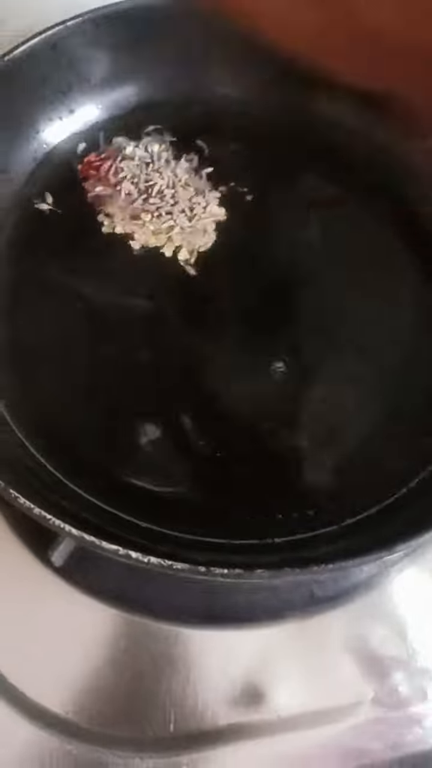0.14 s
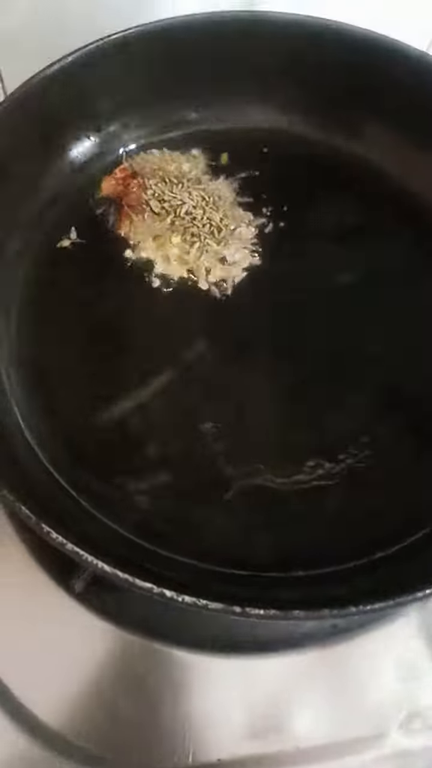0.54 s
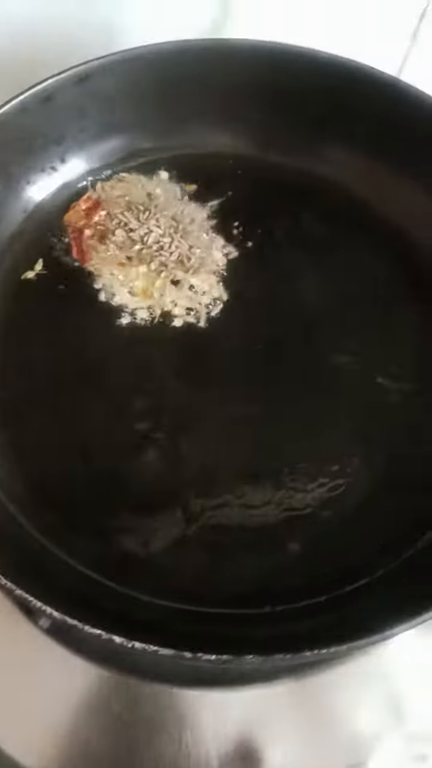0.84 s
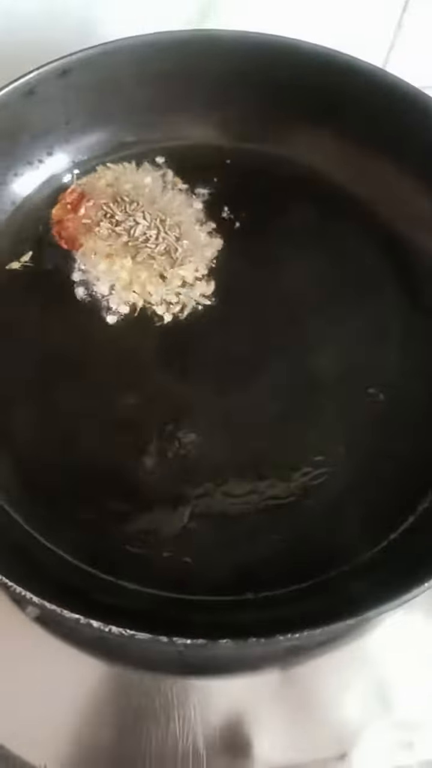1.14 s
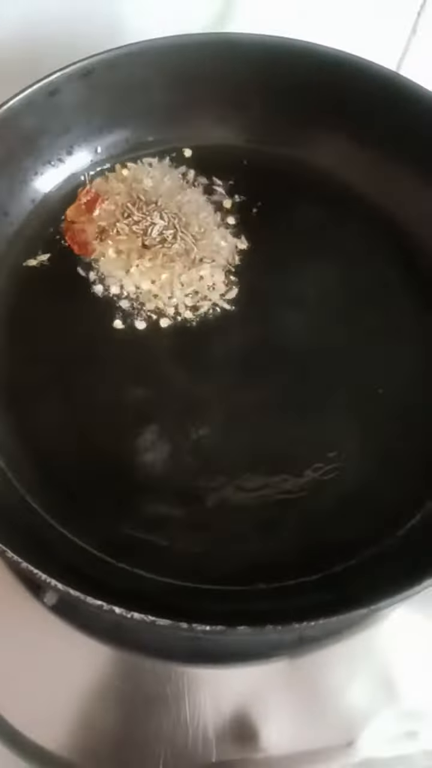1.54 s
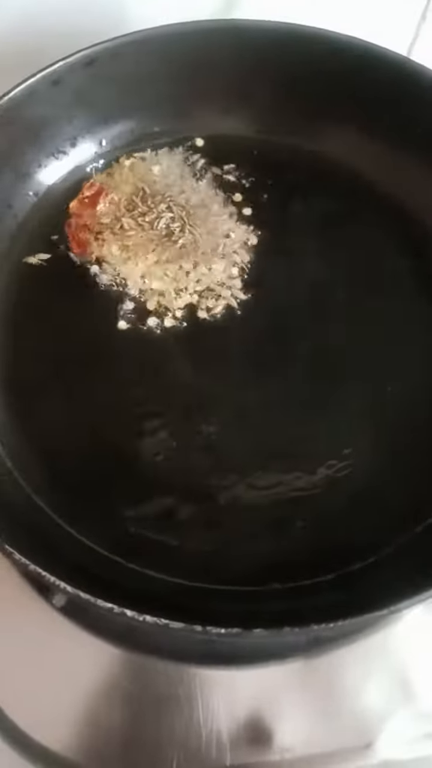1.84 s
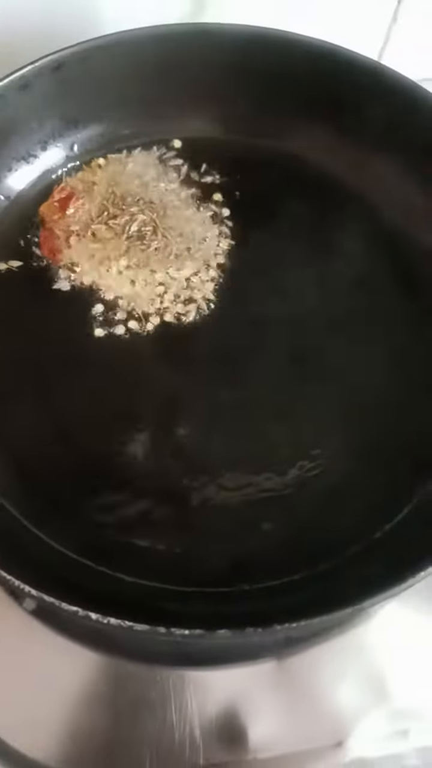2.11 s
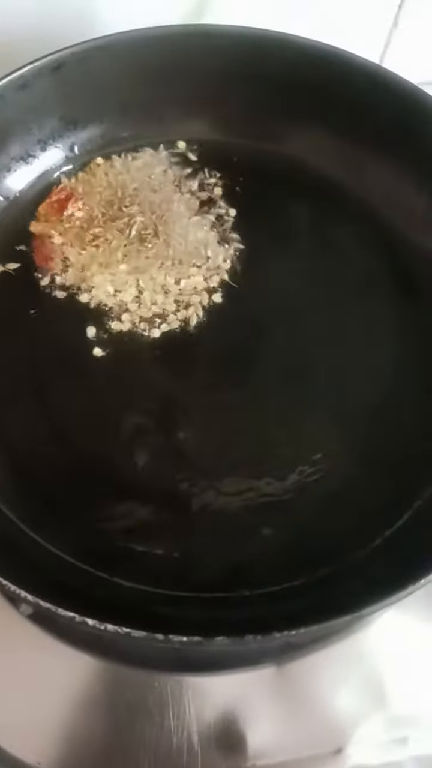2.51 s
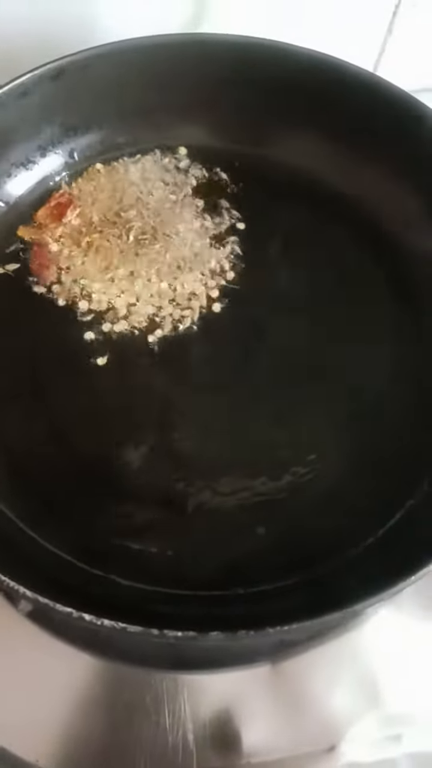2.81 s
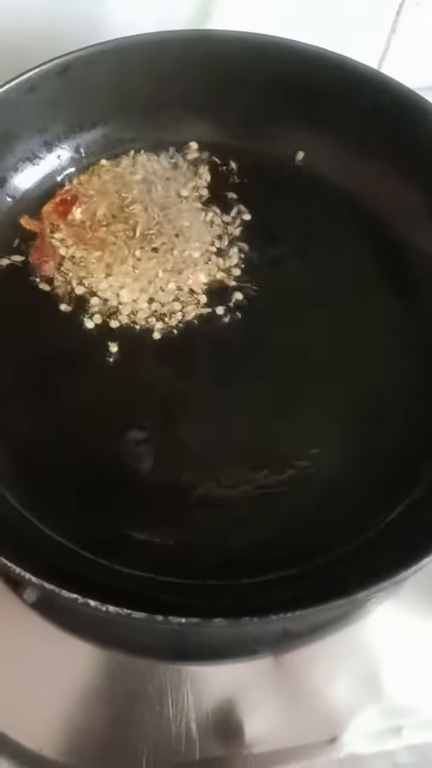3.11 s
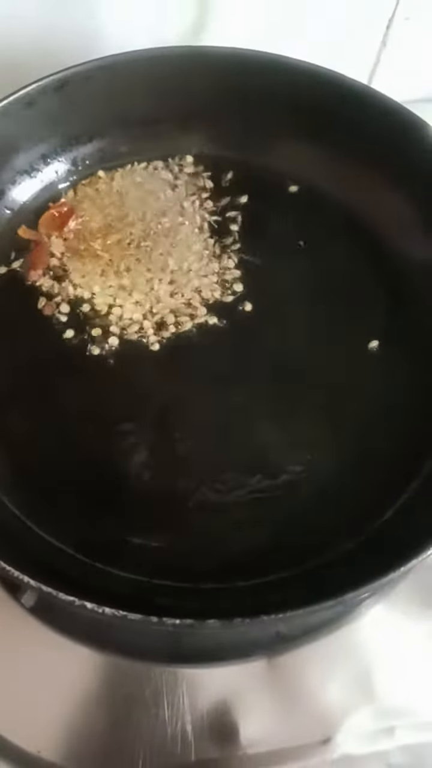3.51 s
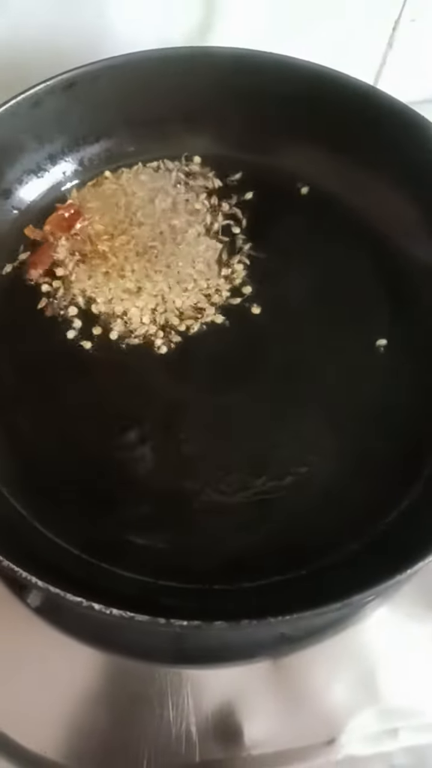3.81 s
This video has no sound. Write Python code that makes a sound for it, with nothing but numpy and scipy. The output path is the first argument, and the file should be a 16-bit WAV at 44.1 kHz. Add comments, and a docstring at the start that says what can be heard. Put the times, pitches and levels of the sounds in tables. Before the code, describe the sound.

Seeds fry in hot oil in an iron pan: light metal clinks and fine hiss first, a hollow knocking near one second, then dense sharp pops in a small hard kitchen, close microphone.

```python
"""Frying hisses from the first moment with light clinks of a spoon, then spice seeds pop in hot oil.
The hiss is thousands of tiny bubble clicks; each pop is a snap, a short ring and echoes off the iron pan.
The hardest bursts overload the microphone with a low thump; something hollow is knocked and set down.
A small hard kitchen echoes the pops and knocks, over an uneven low rumble.
A gain control turns the sound down after loud peaks."""
import sys
import numpy as np
from scipy import signal
from scipy.fft import rfft, irfft
from scipy.io import wavfile

SR = 44100
rng = np.random.default_rng(int(sys.argv[2]) if len(sys.argv) > 2 else 0)


def to_wav(sig):
    """Store sig (one row per channel, or 1-D mono) as 16-bit WAV at the path in sys.argv[1].

    Samples outside -1..1 are clipped; the rate is SR.
    """
    pcm = np.clip(np.atleast_2d(sig), -1, 1) * 32767
    pcm = np.round(pcm).astype(np.int16)
    wavfile.write(sys.argv[1], SR, pcm.T)  # frames by channels


N = 174195  # length in samples

# Tone of fizzing steam, also used for the tick of a clink: pitch_hz [Hz], level_db [relative dB per Hz]
FIZZ_TONE = [(400, -96), (900, -38), (1300, -13), (1800, -3.5), (2600, 1.5), (3800, 2), (4400, -2),
             (5500, 6), (7200, 1.5), (9600, -10), (11500, -5), (14000, 0.5), (16000, -4.5)]
POP_PAN_DB = 6  # left minus right
POP_DB = 4.5  # added to every pop


def from_db(db):
    """Turn decibels into a gain."""
    return 10 ** (np.asarray(db) / 20)


def rms_one(x):
    """Scale a sound to an average strength (rms) of 1."""
    return x / np.sqrt(np.mean(x ** 2) + 1e-20)


def energy_one(x):
    """Scale each channel to a total energy of 1."""
    return x / np.sqrt(np.sum(x ** 2, axis=-1, keepdims=True) + 1e-20)


def pan(db):
    """Give left and right gains that differ by db and keep the total power fixed."""
    gains = from_db([[db / 2], [-db / 2]])
    return rms_one(gains)


def fade(t, t60):
    """Die away smoothly, losing 60 dB in t60 seconds."""
    return np.exp(-np.log(1000) * t / t60)


def add(out, s, sound):
    """Mix a sound in, starting at s seconds."""
    i = max(int(s * SR), 0)
    out[:, i:i + sound.shape[-1]] += sound[..., :N - i]


def band(x, low_hz, high_hz):
    """Keep mainly the pitches between two limits."""
    limits_hz = [low_hz, min(high_hz, SR / 2 - 1000)]
    return signal.sosfilt(signal.butter(2, limits_hz, "band", fs=SR, output="sos"), x)


def colour(x, spectrum):
    """Give a sound the listed spectrum with a filter that never acts early (minimum phase)."""
    size = 4096
    hz, db = np.transpose(spectrum)
    bin_hz = np.arange(size // 2 + 1) * SR / size
    bin_db = np.interp(np.log(bin_hz + 1), np.log(hz), db)
    # Folding the cepstrum forward in time makes the filter minimum-phase
    cepstrum = irfft(np.log(from_db(bin_db)))
    cepstrum[1:size // 2] *= 2
    cepstrum[size // 2 + 1:] = 0
    response = irfft(np.exp(rfft(cepstrum)))
    return signal.fftconvolve(x, response[None], axes=1)[:, :x.shape[1]]


def ring(modes, t, uneven_db):
    """One blow makes a body ring at each of its pitches, with random strengths and side differences."""
    total = 0
    for hz, db, t60 in modes:
        strength = from_db(db + uneven_db * rng.normal(size=(2, 1)))
        start_cycles = rng.random() + 0.029 * rng.normal(size=(2, 1))
        total = total + strength * fade(t, t60) * np.sin(2 * np.pi * (hz * t + start_cycles))
    return total


def burst(pitch_hz, low_db, top_db, ring_share):
    """A husk snaps, its steam pocket rings briefly and the pan walls echo the snap."""
    # Tone of the crack: pitch_hz [Hz], level_db [relative dB per Hz]
    crack_tone = [(500, -31), (1200, -9.5), (2000, 6), (2700, 4.5), (3700, 6), (4400, 1.5), (5600, 16.5),
                  (7200, 16.5), (8500, 0.5), (10000, -88)]
    snap_s, echo_t60_s, pocket_t60_s = 0.00036, 0.013, 0.0028
    echo_db, left_lag_s = -8, 0.00027
    t = np.arange(SR // 40) / SR

    snap = energy_one(rng.normal(size=len(t)) * np.exp(-t / snap_s))
    echo_shape = fade(t, echo_t60_s) * (1 - np.exp(-t / snap_s))
    echoes = energy_one(rng.normal(size=(2, len(t))) * echo_shape)
    push = snap + from_db(echo_db) * pan(POP_PAN_DB) * echoes

    pocket_ring = np.sin(2 * np.pi * pitch_hz * t) * fade(t, pocket_t60_s)
    pocket = signal.fftconvolve(push, pocket_ring[None], axes=1)[:, :len(t)]
    plain_part = (1 - ring_share) * energy_one(colour(push, crack_tone))
    ringing_part = ring_share * energy_one(colour(pocket, crack_tone))
    crack = energy_one(plain_part + ringing_part)

    click = 1.0 * (t == 0)
    body = energy_one(band(click, 600, 3800))
    top = energy_one(band(push, 11900, 18100))
    sound = crack + from_db(low_db) * body + from_db(top_db) * top
    lag = np.zeros(int(left_lag_s * SR))
    sound[0] = np.concatenate([lag, sound[0]])[:len(t)]
    return sound * np.sqrt(SR / 200)  # the crack alone would have rms 1 over 5 ms


def pops():
    """Seeds burst one by one; each also sends a plain click out into the room."""
    # Each seed burst: start_s [s], level_db [dB before POP_DB], pitch_hz [Hz],
    # low_db [body, dB from the crack], top_db [top sizzle, dB from the crack]
    seeds = [(0.094, -43, 5500, -30, 2.5), (0.5587, -43.5, 6050, -6.5, 7), (0.738, -31.5, 4130, -37, -1),
             (1.0831, -24.5, 5440, -29, -12.5), (1.2597, -26, 5300, -34, -17.5),
             (1.344, -29.5, 5800, -33, -31), (1.3858, -27, 5570, -15, -9), (1.4001, -25.5, 5170, -34, -19),
             (1.436, -31, 5800, -41, 3), (1.478, -23.5, 4970, -31, -12.5), (1.5498, -29.5, 4100, -28, -9),
             (1.5634, -23, 5960, -21, -63), (1.6967, -25.5, 4200, -28, -11), (1.725, -29.5, 2730, -21, -4),
             (1.765, -29, 5370, -20, -7.5), (1.774, -31, 6440, -9, -2), (2.0186, -33.5, 4830, -22, -8.5),
             (2.1023, -27, 2940, -36, -5.5), (2.122, -28, 5460, -18, -1.5), (2.157, -25.5, 4220, -26, -13),
             (2.2054, -26, 5400, -17.5, -3.5), (2.2597, -29, 6400, -19, -1),
             (2.2766, -28.5, 3430, -25, -18), (2.299, -26, 3100, -27, -9), (2.3493, -29, 5900, -10.5, 2),
             (2.4297, -26.5, 6730, -20, -5.5), (2.4844, -24.5, 3540, -26, -10),
             (2.6686, -27.5, 5600, -12, -1.5), (2.7312, -29.5, 6000, -33, -3.5),
             (2.7858, -36, 4940, -37, -18), (2.796, -34, 6040, -104, 0.5), (2.8501, -28.5, 2830, -40, -12),
             (2.8619, -30.5, 2800, -27, -5), (2.969, -24.5, 4430, -25, -19),
             (3.0532, -27.5, 5560, -24, -6.5), (3.092, -27, 6520, -13, -1), (3.1771, -28.5, 5200, -43, -22),
             (3.188, -32, 7300, -20.5, 3.5), (3.2103, -25.5, 6730, -13, -13), (3.3443, -25, 5200, -19, -11),
             (3.379, -25.5, 4160, -57, -32), (3.4324, -25, 5800, -16.5, -8),
             (3.4611, -25.5, 5440, -18, 0.5), (3.8213, -32, 4970, -23.5, -7)]
    out, sent = np.zeros((2, N)), np.zeros((2, N))
    for start_s, level_db, pitch_hz, low_db, top_db in seeds:
        gain = from_db(level_db + POP_DB)
        side = pan(POP_PAN_DB + rng.normal())
        add(out, start_s, gain * side * burst(pitch_hz, low_db, top_db, ring_share=0.52))
        click = np.array([np.sqrt(SR / 200)])  # a single sample
        add(sent, start_s, gain * click)
    return out, sent


def blasts():
    """The hardest bursts crack and kick the microphone, which recovers through its low cut."""
    # Each hard burst: start_s [s], crack_db [dB before crack_boost_db],
    # left_kick and right_kick [signed, full scale 1, before the low cut], left_lag_s [s]
    hard_bursts = [(1.1345, -42, -0.038, 0.51, 0.00024), (1.7154, -43, -0.01, -0.052, 0.0009),
                   (2.4580, -25.5, 0.76, -0.58, 0.00025), (2.491, -32, -0.88, -1.64, 0.00041),
                   (2.765, -33.5, 0.013, 0.38, 0.00047), (3.0031, -34.5, 0.85, 0.6, 0.001),
                   (3.2686, -41, 0.019, 0.35, .0003), (3.4467, -33.5, -0.069, -0.27, 0.00051),
                   (3.5820, -32.5, -0.22, 0.28, 0.00066)]
    crack_boost_db, low_cut_hz = 3, 73.5
    front_s, front_share, kick_decay_s = 0.00016, 0.8, 0.021
    cracks, kicks = np.zeros((2, N)), np.zeros((2, N))
    t = np.arange(SR // 2) / SR
    for start_s, crack_db, left_kick, right_kick, left_lag_s in hard_bursts:
        crack = burst(pitch_hz=2270, low_db=-3, top_db=-3, ring_share=0.1)
        add(cracks, start_s, from_db(crack_db + crack_boost_db) * crack)
        # A sharp front, then a slower swing the other way
        since_s = np.maximum(t - np.array([[left_lag_s], [0]]), 0)
        front = -front_share * np.sin(np.pi * since_s / front_s)
        swing = np.where(since_s < front_s, front, np.exp(-since_s / kick_decay_s))
        add(kicks, start_s, np.array([[left_kick], [right_kick]]) * swing)
    low_cut = signal.butter(4, low_cut_hz, "high", fs=SR, output="sos")
    thumps = signal.sosfilt(low_cut, kicks + 1e-18)  # the tiny offset avoids slow arithmetic
    return cracks, thumps


def sizzle():
    """Thousands of tiny steam bubbles break each second, over a smooth hiss."""
    # Loudness of the frying: time_s [s], level_db [dB before fizz_db]
    loudness = [(0, -37), (.06, -45), (0.171, -45), (0.248, -40.5), (.6, -42), (.85, -38), (1.3, -38.5),
                (1.95, -37.5), (2.3, -34.5), (2.8, -39.5), (3.451, -36), (3.75, -38), (3.95, -41)]
    fizz_db, fizz_pan_db = -3.5, 2.5
    bubbles_per_s, bubble_spread_db = 6600, 3.5
    steam_share = 0.081  # share of power in the smooth hiss, before colouring
    level = from_db(fizz_db + np.interp(np.arange(N) / SR, *np.transpose(loudness)))
    sizes = from_db(bubble_spread_db * np.minimum(rng.exponential(1, N), 4))
    breaks = rng.random(N) < bubbles_per_s / SR
    bubbles = rms_one(sizes * breaks * rng.normal(size=(2, N)))
    hiss = rng.normal(size=(2, N))
    fizz = np.sqrt(1 - steam_share) * bubbles + np.sqrt(steam_share) * hiss
    return level * pan(fizz_pan_db) * rms_one(colour(fizz, FIZZ_TONE))


def knocks():
    """Each knock is a rattling thud; the hollow container rings at pitches that shift as it rocks."""
    # Each knock: start_s [s], level_db [dB before thud_db and ring_db]
    bumps = [(0.401, -50), (.458, -63), (0.959, -21), (0.965, -13), (1.17, -15), (1.180, -15), (1.196, -18),
             (1.214, -18), (1.239, -15.5), (1.271, -30), (1.29, -22), (1.303, -27.5), (1.343, -27),
             (1.377, -34), (1.474, -30.5), (2.085, -56)]
    # Ringing of the container: pitch_hz [Hz before wandering], level_db [relative dB], t60_s [s]
    container = [(180, -7, .35), (275, -4, .18), (357, 2, .25), (460, -2, .18), (615, -4, .3),
                 (775, -5, .38)]
    # Tone of the thud: pitch_hz [Hz], level_db [relative dB per Hz]
    thud_tone = [(100, -37.5), (180, -10), (260, 3), (400, 4.5), (650, -1.5), (1100, -7.5), (2200, -8),
                 (4000, -18), (7000, -20), (12000, -66)]
    thud_db, thud_t60_s, ring_db = -4, 0.1, -19
    rattle_db, rattle_per_s, pitch_wander = 3, 400, 0.025  # wander is a share of the pitch
    out, t = np.zeros((2, N)), np.arange(SR // 2) / SR
    for start_s, level_db in bumps:
        wobble = np.interp(t * rattle_per_s, np.arange(len(t)), rng.normal(size=len(t)))
        # Mostly the same noise on both sides
        noise = rng.normal(size=len(t)) + 0.17 * rng.normal(size=(2, len(t)))
        contact = from_db(rattle_db * wobble) * noise
        thud = rms_one(colour(contact, thud_tone)) * fade(t, thud_t60_s)
        modes = [(hz * (1 + pitch_wander * rng.normal()), db, t60) for hz, db, t60 in container]
        hollow = ring(modes, t, uneven_db=2)
        onset = 1 - np.exp(-t / 0.0011)
        knock = from_db(thud_db) * thud + from_db(ring_db) * hollow
        add(out, start_s, from_db(level_db) * onset * knock)
    return out


def clinks():
    """Light touches on spoon and pan each make a short tick and a thin metal ring."""
    # Each touch: start_s [s], spoon_db and pan_db [dB before tick_db and ring_db]
    touches = [(.002, -56, -46), (.094, -58, -64), (.194, -38, -51), (.268, -41, -49), (.326, -42, -60),
               (3.801, -60, -45)]
    # Ringing of the spoon: pitch_hz [Hz], level_db [relative dB], t60_s [s]
    spoon_modes = [(3343, 0, .11), (3429, 2, .11), (5017, 0, .12), (5636, -7, .08), (13780, -4, .08)]
    # Ringing of the iron pan: pitch_hz [Hz], level_db [relative dB], t60_s [s]
    pan_modes = [(1755, -2, .5), (1803, -1, .7), (2430, -7, .12), (2740, -3, .15)]
    tick_db, tick_t60_s, ring_db = 7.5, 0.028, -5
    out, t = np.zeros((2, N)), np.arange(SR // 2) / SR
    for start_s, spoon_db, pan_db in touches:
        for level_db, modes in ((spoon_db, spoon_modes), (pan_db, pan_modes)):
            noise = rng.normal(size=(2, len(t)))
            tick = rms_one(colour(noise, FIZZ_TONE)) * fade(t, tick_t60_s)
            metal = ring(modes, t, uneven_db=1.5)
            add(out, start_s, from_db(level_db + tick_db) * tick + from_db(level_db + ring_db) * metal)
    return out


def kitchen(x):
    """A small hard room smears sound into a fading tail, modelled as decaying noise."""
    room_t60_s, build_s = 0.56, 0.0024
    t = np.arange(SR) / SR
    tail = rng.normal(size=(2, SR)) * fade(t, room_t60_s) * (1 - np.exp(-t / build_s))
    return signal.fftconvolve(x, energy_one(tail), axes=1)[:, :N]


def room_sound(sent, cracks, thumps, bumps):
    """The kitchen echoes the pops, the hard bursts and the knocks."""
    # Tone of the pops' echo: pitch_hz [Hz], level_db [relative dB per Hz]
    echo_tone = [(600, -16.5), (1500, -5), (2600, 2), (6500, -2), (9500, -19.5), (14000, -5.5)]
    pop_room_db, blast_room_db, knock_room_db = -7.5, -8.5, -2
    hard = cracks + band(thumps, 1700, 4900)
    spray = colour(from_db(pop_room_db) * sent + from_db(blast_room_db) * hard, echo_tone)
    return kitchen(spray + from_db(knock_room_db) * bumps)


def rumble():
    """The low background of the kitchen is deep noise that swells and sinks at random."""
    # Tone of the background: pitch_hz [Hz], level_db [relative dB per Hz]
    rumble_tone = [(25, -65), (60, -8), (110, 4), (170, 2.5), (250, -14), (360, -15), (550, -31),
                   (1200, -18.5), (3000, -58.5)]
    rumble_db, lumps_db = -67.5, 7  # level before the swells, and their random spread
    noise = rng.normal(size=N) + 0.43 * rng.normal(size=(2, N))
    steady = from_db(rumble_db) * rms_one(colour(noise, rumble_tone))
    swells = np.interp(np.linspace(0, 1, N), np.linspace(0, 1, num=40), rng.normal(size=40))
    return from_db(lumps_db * swells) * steady


def scene():
    """Mix the pan, the knocks, the echoes and the low background."""
    bursts, sent = pops()
    cracks, thumps = blasts()
    bumps = knocks()
    room = room_sound(sent, cracks, thumps, bumps)
    return bursts + cracks + thumps + sizzle() + bumps + clinks() + room + rumble()


def record(dry):
    """The gain drops just after loud peaks, most after thumps, and recovers; peaks clip, the top is cut."""
    duck_above_db, duck_share = -6.5, 0.52  # share of the excess taken away
    attack_s, release_db_per_s = 0.0033, 215.5
    bass_boost_db, bass_hz = 27.5, 97
    top_cut_hz = 15950
    bass = signal.sosfilt(signal.butter(2, bass_hz, fs=SR, output="sos"), dry)
    peak = (np.abs(dry) + from_db(bass_boost_db) * np.abs(bass)).max(0)
    over_db = duck_share * np.maximum(20 * np.log10(peak + 1e-9) - duck_above_db, 0)
    # Hold each peak and let it fall at a steady rate in dB
    ramp = release_db_per_s * np.arange(N) / SR
    held_db = np.maximum.accumulate(over_db + ramp) - ramp
    r = np.exp(-1 / (attack_s * SR))
    duck_db = signal.lfilter([1 - r], [1, -r], held_db)
    clipped = np.clip(dry * from_db(-duck_db), -1, 1)
    return signal.sosfilt(signal.ellip(10, 0.2, 80, top_cut_hz, fs=SR, output="sos"), clipped)


dry = scene()
out = record(dry)
to_wav(out)
```